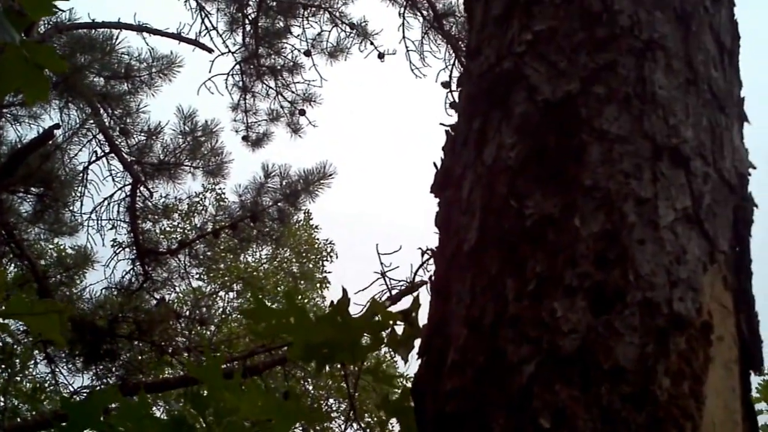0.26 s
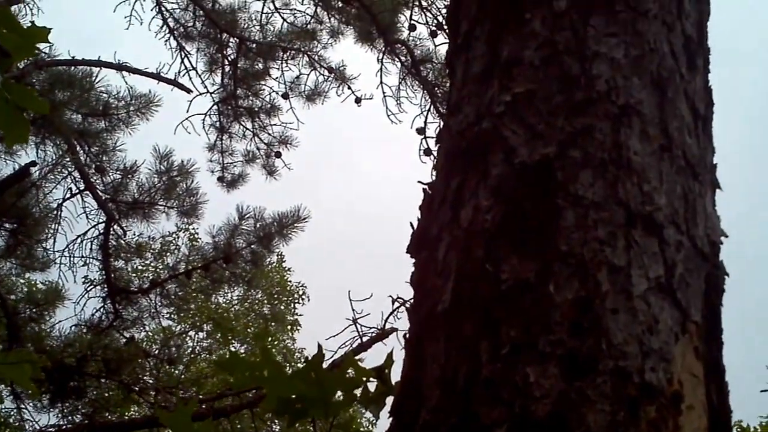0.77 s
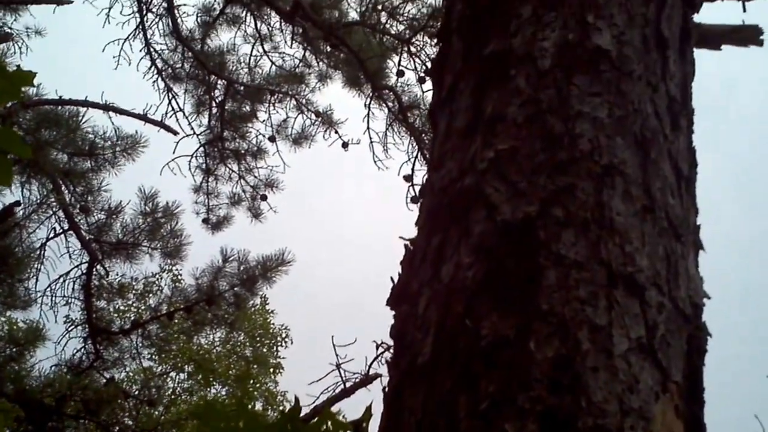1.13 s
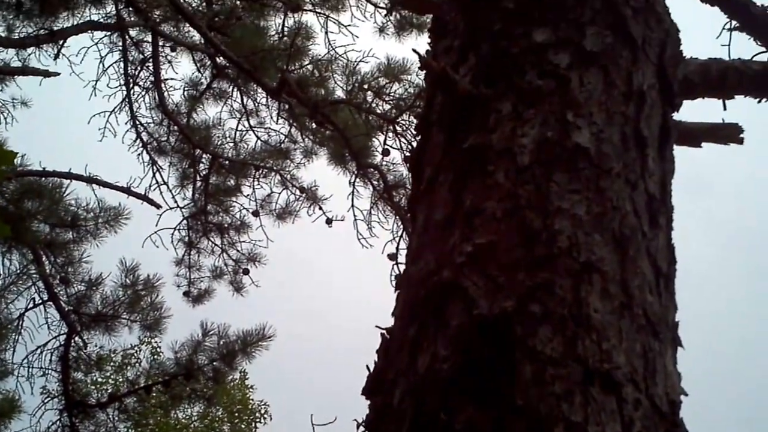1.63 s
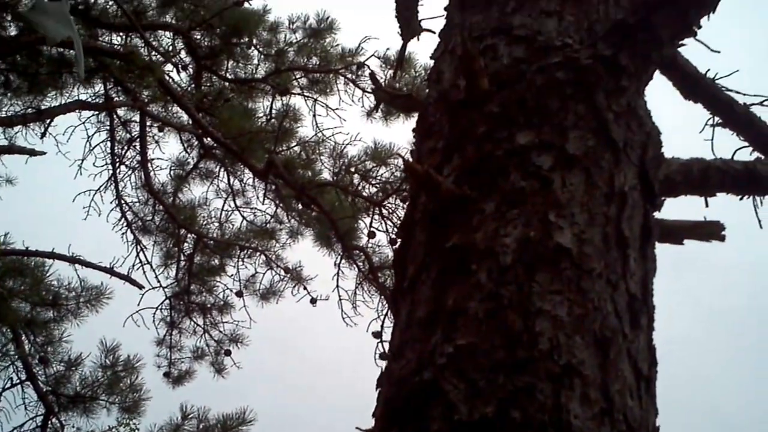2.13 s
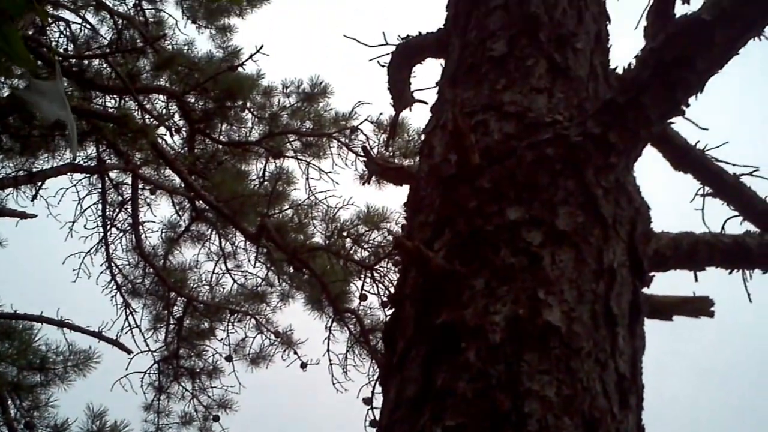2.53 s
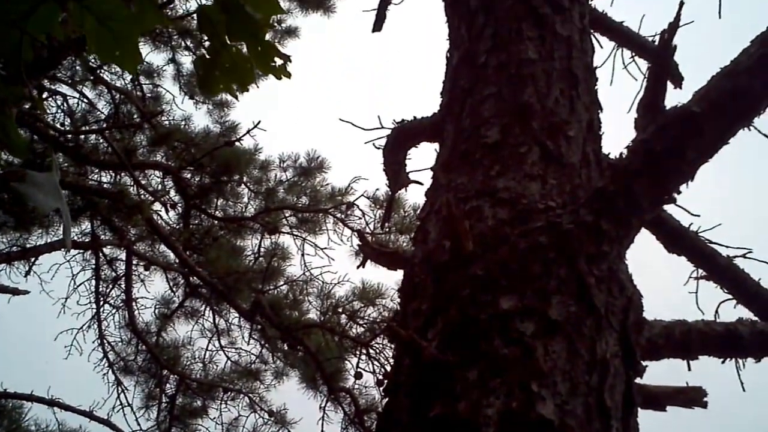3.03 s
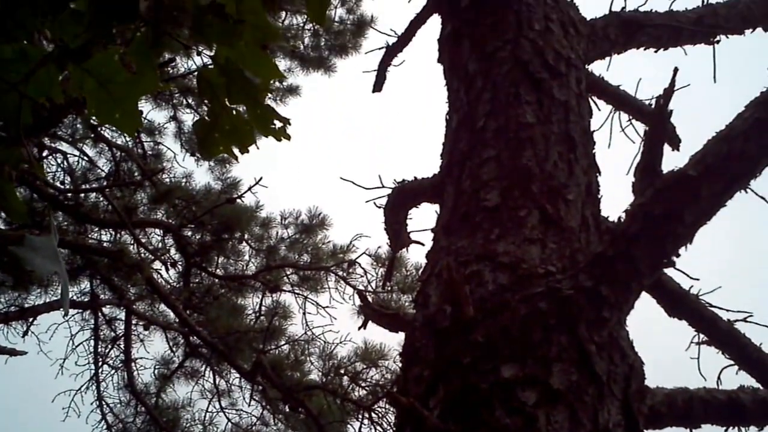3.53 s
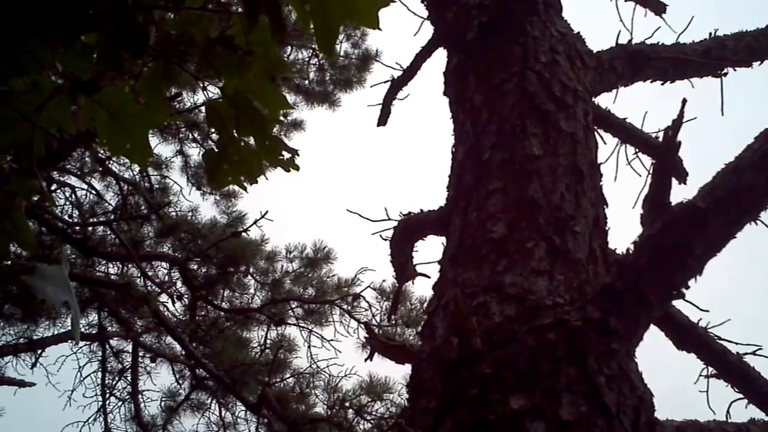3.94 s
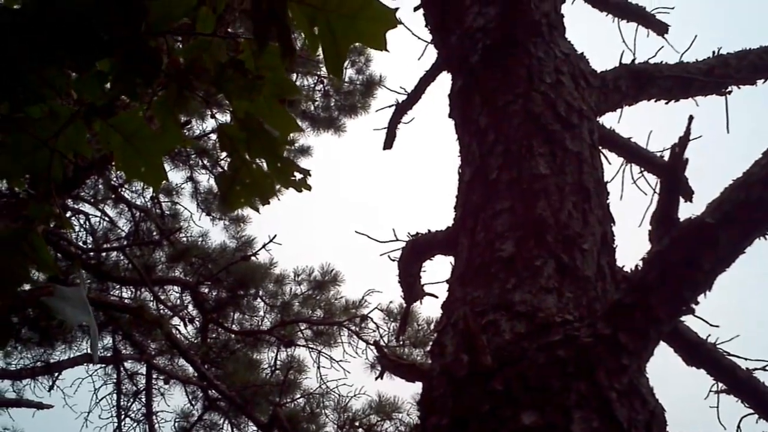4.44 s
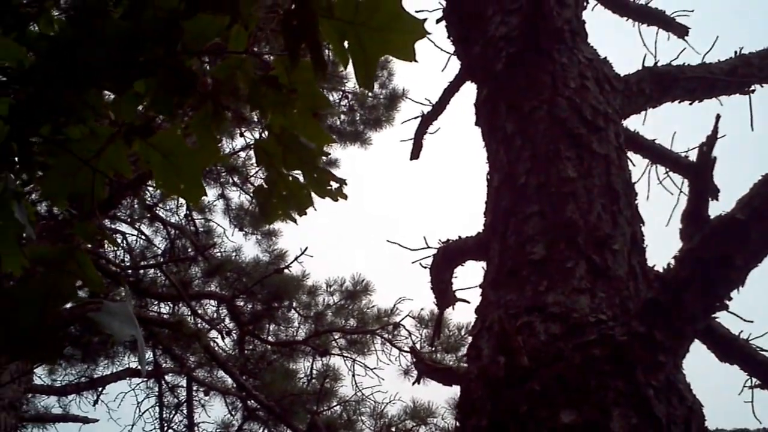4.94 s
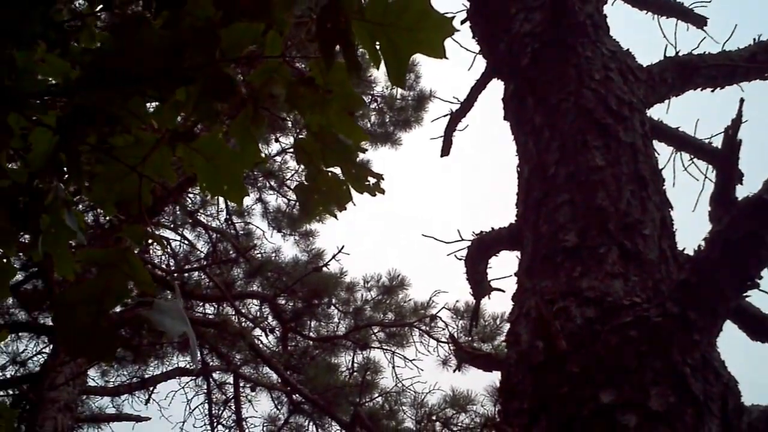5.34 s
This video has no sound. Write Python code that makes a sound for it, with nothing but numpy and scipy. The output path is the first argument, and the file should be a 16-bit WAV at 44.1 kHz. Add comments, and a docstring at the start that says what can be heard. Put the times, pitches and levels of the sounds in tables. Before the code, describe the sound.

One cicada in a pine tree dominates from the start with a clean, shrill, metallic buzz. It swells to a peak before one second, then drops in pitch, turns rougher and steadily dies away. Short echoes from twigs make the tone shimmer. Behind it are soft air noise, a very faint high insect hiss and a low distant traffic hum. It sounds like a phone microphone outdoors, with a wide, diffuse stereo image.

```python
"""Cicada in a pine

A cicada high in a pine sings a clean buzz that peaks, then slows, roughens and dies away.
Its two ribbed drums click in turn and ring the body; twigs scatter the sound as short echoes.
Behind it lie filtered noises: soft air, two thin bands of far insects and a low hum of far traffic.
The right channel plays the cicada, insects and shared air upside down and a third of a millisecond late."""
import sys
import numpy as np
from scipy import signal
from scipy.fft import rfft, irfft, next_fast_len
from scipy.io import wavfile
from scipy.ndimage import uniform_filter1d

SR = 44100
rng = np.random.default_rng(int(sys.argv[2]) if len(sys.argv) > 2 else 0)


def generate_wav(signal):
    """Clip the signal to [-1, 1] and save it as 16-bit WAV at the path in sys.argv[1]."""
    frames = np.transpose(np.atleast_2d(signal))
    scaled = np.clip(frames, -1, 1) * 32767
    pcm = np.round(scaled).astype(np.int16)
    wavfile.write(sys.argv[1], SR, pcm)


N = 246519  # length in samples


def undb(db):
    """Turn a level in dB into a gain."""
    return 10 ** (np.asarray(db) / 20)


def unit(x):
    """Scale to rms 1."""
    return x / np.sqrt(np.mean(x ** 2))


def over_time(table):
    """Draw straight lines through (time, value) points, one value per sample."""
    return np.interp(np.arange(N) / SR, *np.transpose(table))


def on_log(table):
    """Read (frequency, value) points along a log-frequency axis."""
    hz, value = np.transpose(table)
    return lambda f: np.interp(np.log(f), np.log(hz), value)


def filtered(x, response):
    """Multiply the spectrum by a response given as a function of Hz."""
    size = next_fast_len(N + SR // 10)  # spare room for the filter's tail
    f = np.arange(size // 2 + 1) * SR / size + 1e-3  # never exactly 0 Hz
    return irfft(rfft(x, size) * response(f), size)[:N]


def filtered_noise(response):
    """Shape fresh white noise with a response."""
    return filtered(rng.standard_normal(N), response)


def mode(f, hz, width):
    """A steep resonance: two equal band-passes in a row, each of the given width."""
    return (1 + 1j * (f / hz - hz / f) * hz / width) ** -2


def walk(hz):
    """A smooth random drift: levels held 1 / hz seconds, averaged twice; spread near 1."""
    hold = int(SR / hz)
    steps = np.repeat(rng.standard_normal(N // hold + 1), hold)
    smooth = uniform_filter1d(uniform_filter1d(steps, hold), hold)
    return 1.3 * smooth[:N]


def clicks(at_s, size):
    """Place band-limited clicks between the samples, as windowed sinc pulses."""
    out = np.zeros(N + 64)
    place = np.clip(at_s * SR, 0, N) + 16  # 16 samples of margin in front
    tap = np.floor(place)[:, None] + np.arange(-11, 13)
    away = tap - place[:, None]
    pulse = np.sinc(away) * np.cos(np.pi * away / 24) ** 2
    np.add.at(out, tap.astype(int), size[:, None] * pulse)
    return out[16:N + 16]


# Body resonances, which move as the air sac slackens
# columns: width of each band-pass [f/Hz], then [f/Hz, level/dB] at full effort, easing and fading
BODY_MODES = [(1810, 4350, -39, 4000, -34, 4265, -25.5), (585, 5280, -27.5, 5520, -14.5, 5260, -14.5),
              (350, 5855, -13.5, 5980, -12, 5800, -4), (345, 6470, -10.5, 6660, -6.5, 6497, 1.5),
              (308, 7230, -2, 7320, 5.5, 7090, 3), (284, 7620, -4.5, 7950, 2.5, 7680, 1.5),
              (284, 7980, 4.5, 8330, 1.5, 8170, 1.5), (340, 8400, 0.5, 8750, -1, 8600, 1),
              (450, 9150, 0, 9200, -2.5, 9130, -8.5), (400, 9550, -4.5, 9750, -13.5, 10000, -12),
              (400, 10270, -10.5, 10200, -15.5, 10450, -14), (350, 11040, -15, 10800, -22.5, 11050, -17),
              (690, 11900, -21, 11550, -21, 11500, -18), (595, 12520, -22, 12400, -19, 11000, -17),
              (910, 13400, -30, 13300, -33, 12900, -18.5)]
STROKE_MS_PER_KHZ = -1.4  # short ribs buckle first, so each stroke sweeps downward


def body(stage):
    """Response of ribs and air sac when fading (0), easing (1) or at full effort (2)."""
    modes = []
    for row in BODY_MODES:
        hz, db = np.reshape(row[1:], (3, 2))[2 - stage]
        modes.append((row[0], hz, db))

    def response(f):
        sweep = np.exp(-1j * np.pi * STROKE_MS_PER_KHZ * (f / 1000) ** 2)
        # neighbouring resonances have opposite signs
        return sweep * sum((-1) ** m * undb(db) * mode(f, hz, width)
                           for m, (width, hz, db) in enumerate(modes))
    return response


TWIGS_T60_S, TWIGS_DB, TWIGS_SWAY_HZ = .045, -7, 6.5  # fade by 60 dB, level, pace of sway


def twigs(x, count=5):
    """Sets of short dense echoes trade places as twigs and phone sway, so each overtone wavers alone."""
    t = np.arange(int(TWIGS_T60_S * SR)) / SR
    echoes = rng.standard_normal((count, len(t))) * 1000. ** (-t / TWIGS_T60_S)
    echoes /= np.sqrt(np.sum(echoes ** 2, axis=1, keepdims=True))
    sway = np.array([walk(TWIGS_SWAY_HZ) for _ in echoes])
    sway /= np.sqrt(np.sum(sway ** 2, axis=0))  # the scattered energy stays the same
    scattered = sum(w * signal.fftconvolve(x, e)[:N] for w, e in zip(sway, echoes))
    return (x + undb(TWIGS_DB) * scattered) / np.sqrt(1 + undb(2 * TWIGS_DB))


# Muscle rate, slowing as the song goes on: [t/s, f/Hz]
MUSCLE_RATE = [(0.0, 190.2), (0.4, 190.15), (0.6, 189.52), (0.68, 188.78), (0.76, 187.46), (0.92, 183.24),
               (1.0, 181.37), (1.08, 180.05), (1.2, 178.62), (1.4, 176.45), (1.6, 175.0), (2.0, 172.14),
               (2.4, 169.8), (3.2, 165.6), (3.8, 163.06), (4.4, 160.13), (5.59, 155.3)]
RATE_WOBBLE_HZ, WOBBLES_HZ = .08, 14.  # the muscle rate trembles: depth, and how often
# Muscle rate when fading, easing and at full effort: [f/Hz, f/Hz, f/Hz]
EFFORT_RATES = 161.8, 175.9, 188.1
# Level of the even clicks: [t/s, level/dB]
EVEN_LEVEL = [(0, -36), (.1, -35), (.5, -31), (.8, -30.5), (1.0, -33), (1.4, -38.5), (1.5, -36.5),
              (1.65, -40.5), (2.0, -41.5), (2.3, -42.5), (2.7, -45), (3.0, -50.5), (3.5, -52.5), (4.2, -59),
              (4.4, -66), (5.0, -62.5), (5.3, -66), (5.59, -78)]
# Level of the uneven clicks before the rasp filter: [t/s, level/dB]
RASP_LEVEL = [(0, -49), (.12, -45), (.3, -47), (.6, -43), (.9, -43), (1.3, -44), (1.8, -45.5), (2.6, -48),
              (3.3, -49.5), (4.2, -50.5), (4.6, -52.5), (5.3, -54.5), (5.59, -59)]
RASP_HZ, RASP_WIDTH_HZ = 9300, 8000  # loose ribs are short and barely reach the low resonances
# How far the second drum lags the half cycle: [t/s, lag/us]
SECOND_DRUM_LAG = [(0, 6.7), (.1, 26), (.25, 3.2), (.45, 4.9), (.55, 10), (.72, 4.9), (.88, 33), (1.05, 21),
                   (1.25, 17), (1.9, 7.4), (2.15, 33), (2.4, 27), (3.0, 64), (4.0, 20), (4.3, 19),
                   (4.8, 72), (5.1, 55), (5.59, 46)]
LAG_WANDERS_US, LAG_WANDERS_HZ = 3, 9.  # the lag never holds quite still: depth, and how often
# Near the peak the second drum's upper ring turns against the first: [t/s, share turned 0-1]
UPPER_RING_TURNED = [(0, 0), (.25, 0.22), (.45, 0.62), (.62, 0.54), (.8, .75), (.95, 0.94), (1.1, 0.3),
                     (1.35, 0), (1.6, 0.02)]
TURNED_HZ, TURNED_WIDTH_HZ = 9460, 1160


def cicada():
    """Two drums buckle in turn, half a muscle cycle apart; steady ribs give lines, loose ribs a rasp."""
    t = np.arange(N) / SR
    steady_rate = over_time(MUSCLE_RATE)
    rate = steady_rate + RATE_WOBBLE_HZ * walk(WOBBLES_HZ)
    effort = np.interp(steady_rate, EFFORT_RATES, (0, 1, 2))
    lag_us = over_time(SECOND_DRUM_LAG) + LAG_WANDERS_US * walk(LAG_WANDERS_HZ)

    # two strokes a muscle cycle, one from each drum
    cycles = np.cumsum(rate) / SR
    stroke = np.arange(int(2 * cycles[-1]))
    at = np.interp(stroke / 2, cycles, t)
    # a second drum off the exact half cycle brings out the odd overtones
    at += stroke % 2 * np.interp(at, t, lag_us) * 1e-6

    # even clicks vary a little, by about 2 microseconds and 0.4 dB
    chance = rng.standard_normal((len(at), 10))
    beat = at + 2e-6 * chance[:, 0]
    size = undb(.4 * chance[:, 1])
    first = clicks(beat[0::2], size[0::2])
    second = clicks(beat[1::2], size[1::2])
    upper = filtered(second, lambda f: abs(mode(f, TURNED_HZ, TURNED_WIDTH_HZ)))
    # taking the upper ring away twice flips its sign
    even = unit(first + second - 2 * over_time(UPPER_RING_TURNED) * upper)

    # four loose ribs a stroke, each at its own moment (about 1 ms off) and strength
    loose = at[:, None] + 1e-3 * chance[:, 2:6]
    strength = undb(.37 * chance[:, 6:])
    uneven = unit(clicks(loose.ravel(), strength.ravel()))
    rasp = filtered(uneven, lambda f: mode(f, RASP_HZ, RASP_WIDTH_HZ))

    drive = undb(over_time(EVEN_LEVEL)) * even + undb(over_time(RASP_LEVEL)) * rasp
    ring = 0
    for stage in range(3):  # crossfade the three states of the body
        response = body(stage)
        weight = np.clip(1 - abs(effort - stage), 0, 1)
        ring = ring + weight * filtered(drive, response) / np.std(filtered(even, response))
    return twigs(ring)


# Tone colour of the air noise, before it is scaled as a whole: [f/Hz, level/dB in each Hz]
AIR_COLOUR = [(30, -22), (70, -8), (130, 0), (350, -2), (600, -4), (900, -8), (1200, -13), (2000, -16),
              (3000, -23), (3900, -19), (4900, -22.5), (5500, -22), (6200, -20), (9000, -17), (14000, -19),
              (15800, -18)]
# Share of the air noise energy that differs between the channels: [f/Hz, share 0-1]
AIR_APART = [(60, 0), (200, 0.88), (600, 0.86), (1000, 0), (1400, 0), (2200, 0), (6000, 0), (16000, 0)]


def air():
    """Soft air noise: one part common to both channels, two parts of their own."""
    colour, apart = on_log(AIR_COLOUR), on_log(AIR_APART)
    common = filtered_noise(lambda f: undb(colour(f)) * np.sqrt(1 - apart(f)))
    own = np.array([filtered_noise(lambda f: undb(colour(f)) * np.sqrt(apart(f)))
                    for _ in range(2)])
    scale = np.std(common + own[0])
    return common / scale, own / scale


# Far insects: [f/Hz, width of each band-pass f/Hz, level/dB against the air]
INSECT_BANDS = [(14350, 70, -16), (14550, 70, -16)]


def trill():
    """Two thin bands of noise from far insects, each wavering by about 1.5 dB."""
    total = 0
    for hz, width, db in INSECT_BANDS:
        band = unit(filtered_noise(lambda f: mode(f, hz, width)))
        total = total + undb(db + 1.5 * walk(6.)) * band
    return total


# Level of the far traffic: [t/s, level/dB]
TRAFFIC_LEVEL = [(0, -61), (1, -62.5), (1.6, -59), (2.1, -67), (3, -69.5)]
RUMBLE_HZ, RUMBLE_WIDTH_HZ = 179, 215


def rumble(opposite=0.52):
    """A low hum of far traffic: noise in a low band, partly opposite in the two channels."""
    a, b, c = (unit(filtered_noise(lambda f: mode(f, RUMBLE_HZ, RUMBLE_WIDTH_HZ)))
               for _ in range(3))
    shared = np.sqrt(opposite) * np.array([a, -a])
    separate = np.sqrt(1 - opposite) * np.array([b, c])
    return undb(over_time(TRAFFIC_LEVEL)) * (shared + separate)


# The background sinks as the song fades: level, total change, start, and time constant
AIR_DB, AIR_SINKS_DB, AIR_SINKS_FROM_S, AIR_SINK_S = -54, -8.5, 0.94, 1.08
RIGHT_LATE_S = 15 / SR
# Tone colour of the right channel: [f/Hz, level/dB]
RIGHT_TONE = [(60, .5), (200, -1.3), (600, -1), (1400, 0), (3000, .1), (7000, 1.2), (10000, .8),
              (13000, -.8)]


def scene():
    """One sound field feeds both channels, inverted and late on the right; low noise differs."""
    since = np.clip(np.arange(N) / SR - AIR_SINKS_FROM_S, 0, None)
    sink_db = AIR_SINKS_DB * (1 - np.exp(-since / AIR_SINK_S))
    background = undb(AIR_DB + sink_db + .5 * walk(3.13))  # drifts by about 0.5 dB
    common, own = air()
    field = cicada() + background * (common + trill())
    late = filtered(field, lambda f: np.exp(-2j * np.pi * f * RIGHT_LATE_S))
    left, right = np.array([field, -late]) + background * own + rumble()
    right_tone = on_log(RIGHT_TONE)
    return np.array([left, filtered(right, lambda f: undb(right_tone(f)))])


TOP_HZ = 15730


def record(dry):
    """The phone cuts the top with a steep low-pass filter."""
    low_pass = signal.ellip(10, .2, 70, TOP_HZ, fs=SR, output="sos")
    return signal.sosfilt(low_pass, dry)


dry = scene()
out = record(dry)
generate_wav(out)
```